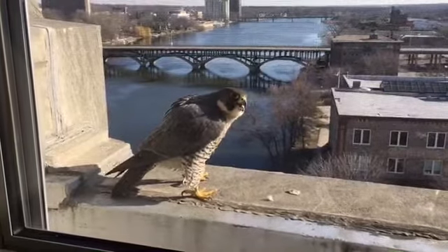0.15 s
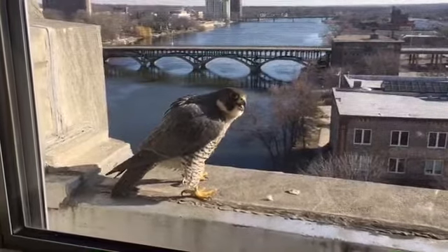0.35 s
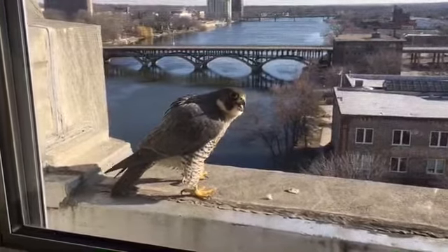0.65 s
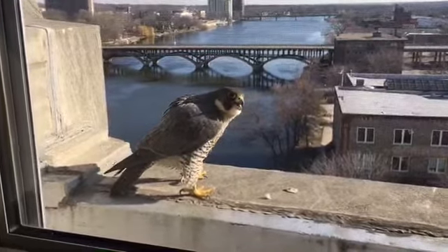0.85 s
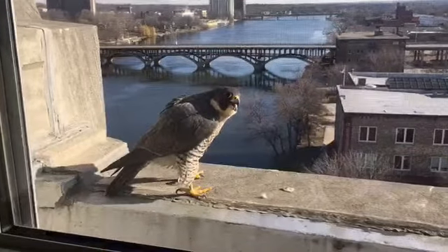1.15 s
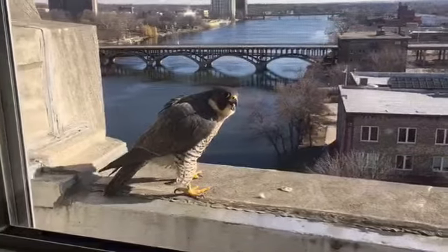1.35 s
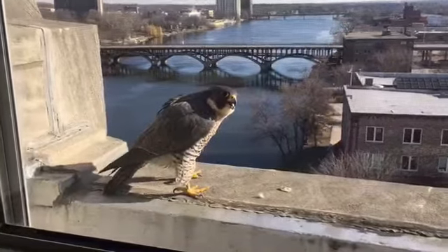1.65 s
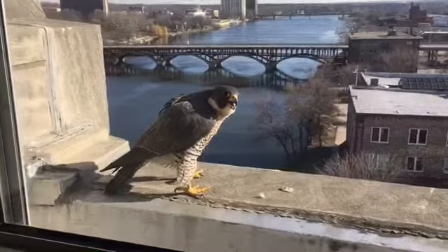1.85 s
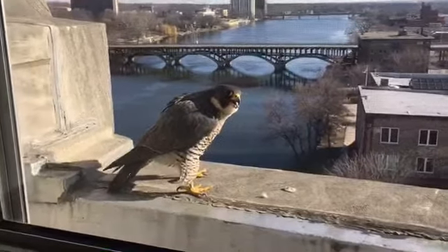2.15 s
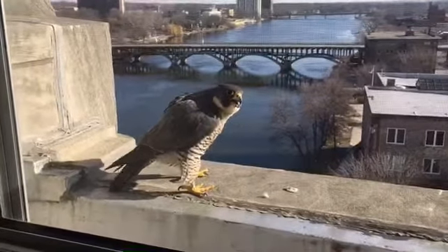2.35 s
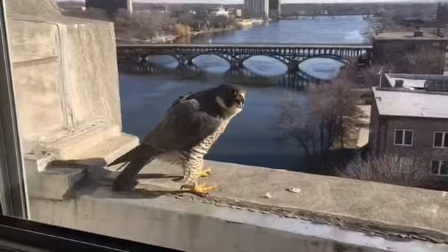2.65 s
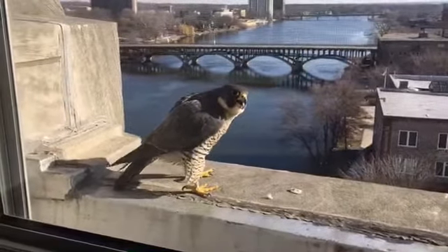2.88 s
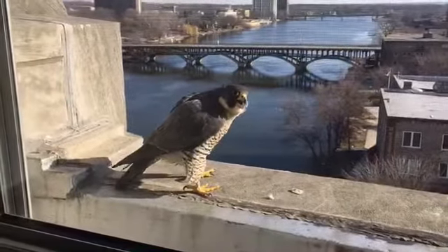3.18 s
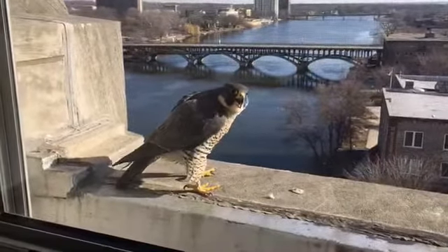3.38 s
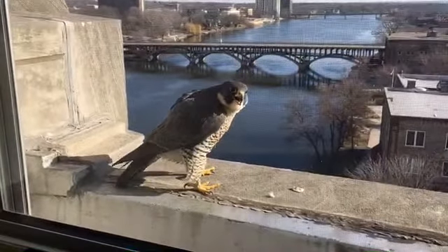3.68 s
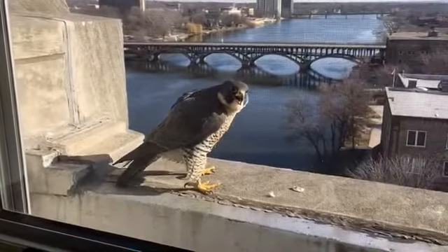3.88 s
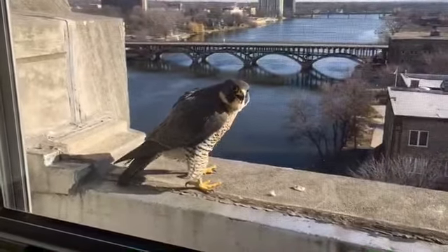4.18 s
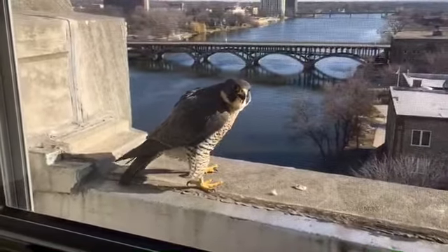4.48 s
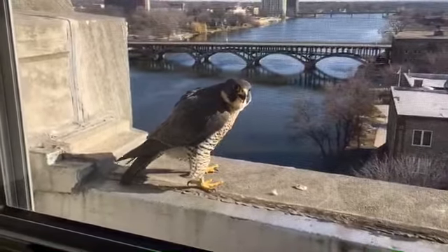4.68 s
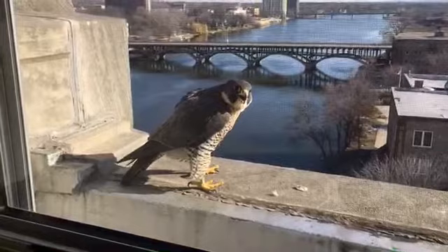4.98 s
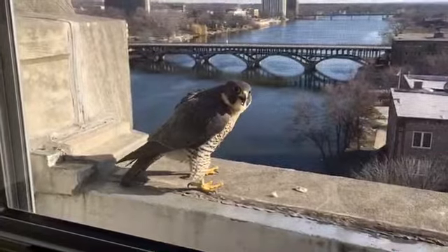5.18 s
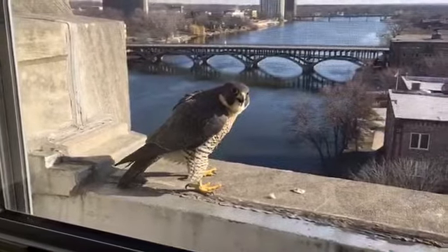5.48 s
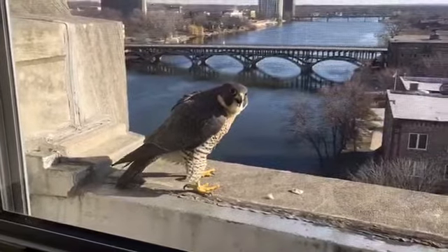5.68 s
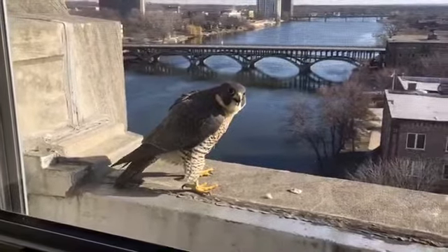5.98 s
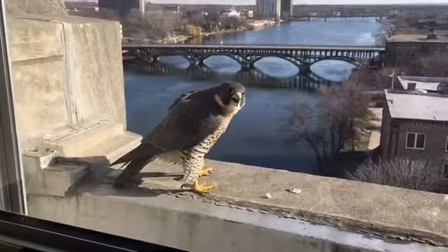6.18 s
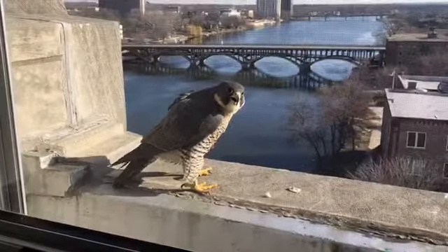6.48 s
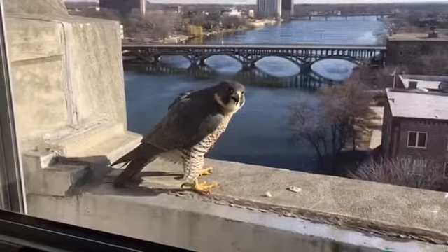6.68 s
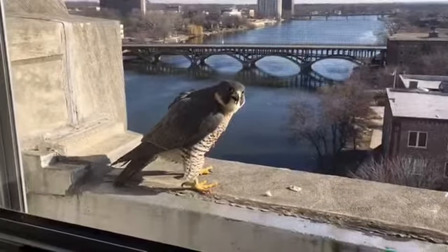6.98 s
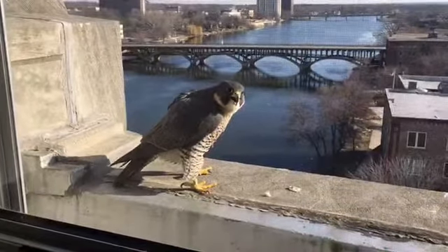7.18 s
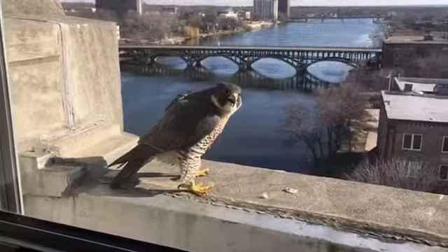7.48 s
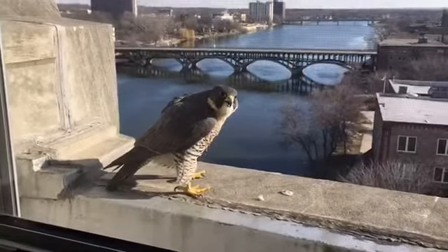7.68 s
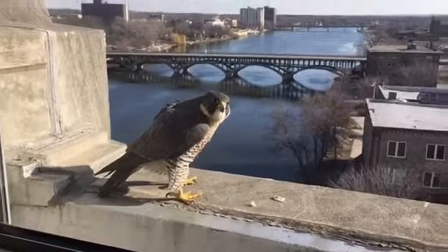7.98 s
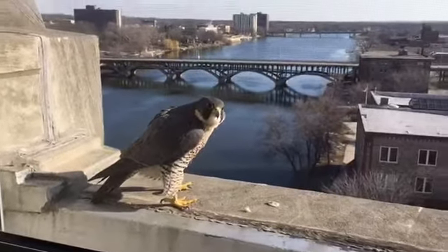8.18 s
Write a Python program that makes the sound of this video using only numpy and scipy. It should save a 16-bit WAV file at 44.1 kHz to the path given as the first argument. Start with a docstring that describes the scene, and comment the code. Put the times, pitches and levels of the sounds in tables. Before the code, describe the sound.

Sharp, raspy falcon cries come in one fast, unbroken run, close by on a stone ledge outside an open window. The calls hold nearly the same pitch and loudness, slowing just a little in the second half. Each has a slight, short echo from the surrounding stone and the room. Underneath lies a faint low rumble and hum of distant traffic and engines.

```python
"""A falcon scolds with a long run of harsh 'kak' calls on a high stone ledge, close to an open window.
Two coupled membranes make each call: a rising whistle and a buzz about two octaves below it.
Midway the buzz breaks loose into a rasp; throat and beak colour the voice.
The stone recess and the room behind the window ring faintly; the city rumbles and hums far below."""
import sys
import numpy as np
from scipy import signal
from scipy.fft import rfft, irfft
from scipy.io import wavfile
from scipy.ndimage import uniform_filter1d

SR = 44100
rng = np.random.default_rng(int(sys.argv[2]) if len(sys.argv) > 2 else 0)


def materialize(psi):
    """Save the field psi as 16-bit PCM at rate SR to the path in sys.argv[1].

    A 1-D psi becomes a single channel; in a 2-D psi each row is a channel.
    """
    bounded = np.clip(np.atleast_2d(psi).T, -1, 1)
    quanta = np.round(bounded * 32767).astype(np.int16)
    wavfile.write(sys.argv[1], SR, quanta)


N = 367794
TIME = np.arange(N) / SR

# calls: (start [s], rasp after [s], length [s], top pitch [Hz], whistle [dB], swell [dB], rasp [dB])
CALLS = [(0.0, 0.08, .140, 1042, -39.5, -2, -37.5), (0.221, 0.092, .149, 1049, -37.5, 6, -38),
         (0.442, 0.086, 0.15, 1051, -39, 2, -38.5), (0.67, 0.086, 0.15, 1050, -37.5, 5, -39),
         (0.897, .091, 0.14, 1049, -37.5, 3.5, -38.5), (1.113, 0.078, .150, 1041, -37.5, 3, -38.5),
         (1.34, 0.089, 0.15, 1051, -36.5, 6.5, -36.5), (1.563, 0.071, 0.14, 1040, -35, 3.5, -37),
         (1.78, 0.087, 0.14, 1058, -35.5, 2, -37), (1.995, .058, 0.15, 1053, -37.5, 3.5, -36.5),
         (2.215, 0.085, .147, 1041, -35.5, 5, -37.5), (2.44, 0.083, 0.14, 1051, -35.5, 6, -37.5),
         (2.651, 0.07, 0.15, 1042, -37.5, 2.5, -36.5), (2.882, 0.086, .140, 1036, -37.5, 1.5, -36.5),
         (3.092, .074, 0.14, 1043, -38.5, 0.5, -37), (3.316, .091, .150, 1051, -37, 7, -36.5),
         (3.543, 0.093, 0.15, 1043, -37.5, 3.5, -37), (3.77, 0.1, 0.15, 1047, -35.5, 5, -37),
         (4.002, 0.093, 0.15, 1040, -37, 6.5, -36.5), (4.221, 0.083, 0.16, 1037, -38, 1, -37),
         (4.461, 0.085, 0.1499, 1048, -37, 4, -39), (4.684, 0.0882, 0.15, 1042, -37.5, 4, -37),
         (4.91, .087, 0.15, 1036, -38, 5, -38.5), (5.148, 0.096, 0.17, 1036, -37.5, 1.5, -37),
         (5.388, .115, 0.16, 1036, -37.5, 3, -38), (5.627, 0.0863, 0.16, 1033, -41.5, -3.5, -38.5),
         (5.859, 0.089, 0.15, 1025, -37.5, 3, -38.5), (6.097, 0.095, 0.17, 1029, -38.5, -0.5, -37),
         (6.351, 0.085, 0.16, 1028, -37.5, 5, -37.5), (6.585, 0.083, 0.16, 1021, -38.5, 0.5, -38),
         (6.821, 0.097, 0.16, 1035, -40, -0.5, -38), (7.069, 0.1, 0.16, 1038, -37.5, 4, -35.5),
         (7.308, 0.081, 0.15, 1047, -37.5, 1, -37.5), (7.538, 0.077, 0.14, 1052, -37.5, 4, -37)]
# whistle harmonics: (multiple [-], relative level [dB])
WHISTLE_HARMONICS = [(1, -14), (2, 4), (3, -11), (4, -16), (5, -42), (6, -31), (7, -39), (8, -33.5),
                     (9, -28.5)]
# throat and beak filter on the buzz: (frequency [Hz], relative gain [dB])
THROAT_COLOUR = [(150, -23), (270, -7.5), (450, -32), (800, -35), (1250, -15.5), (1650, -10), (2250, 4.5),
                 (2750, -1.5), (3200, -6.5), (3500, -11), (3850, -2), (4600, -20.5), (5500, -9),
                 (6600, -28.5), (7700, -18), (9600, -23.5), (10500, -32), (13700, -30), (15500, -39)]
# throat filter, beak half shut: (frequency [Hz], relative gain [dB])
CROAK_COLOUR = [(700, -20.5), (1250, -4.5), (1550, -0.5), (2300, 3.5), (2800, -4.5), (3400, -14.5),
                (6000, -45.5)]
# effect of head aim: (time [s], bite near 3.5 kHz [dB], beak resonance near 5.5 kHz [dB])
HEAD_AIM = [(0, -1.6, 7), (.89, -1, 6.5), (1.11, -1, 0), (1.9, -1.5, -15), (2.9, -1.4, 3), (4.1, -2.7, 4),
            (7.6, -3.5, 3)]
# stone recess resonances: (frequency [Hz], gain [dB])
RECESS_MODES = [(1048, -6), (1339, -2.5), (2070, -9), (2384, -17), (2556, -4), (2768, 5.5), (3100, -4.5),
                (3428, -1), (3686, 7)]
# room behind the window: (frequency [Hz], relative gain [dB])
ROOM_COLOUR = [(200, -2.5), (1050, 9), (2050, 1.5), (3100, 1), (5500, 0.5), (8000, -2.5), (15000, -32)]
# traffic noise: (frequency [Hz], relative density [dB])
TRAFFIC_SPECTRUM = [(25, -22), (38, -5.5), (54, -6), (66, -1), (100, -2.5), (145, -2.5), (200, -15),
                    (300, -15), (420, -27), (680, -33), (1100, -30), (2100, -35), (3500, -42), (7000, -48),
                    (15000, -55)]
# distant machinery: (frequency [Hz], level [dB])
MACHINE_DRONES = [(54.5, -58.5), (78.5, -60), (118, -58), (241, -67)]
# engines that come and go: (start [s], length [s], frequency [Hz], level [dB])
ENGINE_SWELLS = [(-.3, .6, 77.3, -50), (0.352, 1.1, 54.5, -52), (1.95, 0.65, 79, -60),
                 (2.85, 1.9, 55.24, -51.5), (3.75, 1.73, 78.66, -53.5), (5.9, 1.5, 53.6, -58),
                 (6.25, 1.53, 114.7, -53.5)]
# distant motor whine: (time [s], level [dB])
MOTOR_LEVEL = [(0, -69.5), (1.1, -72.5), (4, -76.5), (8.34, -77)]
# thin whines: (frequency [Hz], level [dB])
THIN_WHINES = [(1394, -86), (1739, -82.5)]

ONSET_S, OFFSET_S = .005, .012
CROAK_S, CLEARING_S, BREAK_S = .019, .0132, .02014
CROAK_ROUGH, BASE_ROUGH = .9, .05965  # full rasp = 1
SCOOP_SHARE, SCOOP_SCATTER, SCOOP_TAU_S = .135, .2197, .032
SAG_AFTER_S, SAG_SHARE_PER_S = .1, .42  # pitch sags as the call tires
ATTACK_S, SWELL_S, RELEASE_S, WAVER_DB = .035, .17, .037, 1.35
ATTACK_DB_PER_S, RELEASE_DB_PER_S = 529, 576
BUZZ_DB, RASP_RELEASE_S, RASP_RELEASE_DB_PER_S = -45.5, .024, 420
SHUT_DB, OPEN_DB, OPENING_DB_PER_S, CLOSING_DB_PER_S = -12, 4.5, 23, 214
CROAK_DB, CROAK_LOSS_DB_PER_DB = -49.5, .42


def falcon():
    """Run of calls, each coloured by head aim."""
    out = np.zeros(N + SR)
    times_s, bites_db, beaks_db = np.transpose(HEAD_AIM)
    for start_s, *shape in CALLS:
        call = kak(*shape, np.interp(start_s, times_s, bites_db), np.interp(start_s, times_s, beaks_db))
        i = int(start_s * SR)
        out[i:i + len(call)] += stone_scatter(call)
    return out[:N]


def kak(split_s, length_s, top_hz, level_db, swell_db, rasp_db, bite_db, beak_db):
    """One call: dull croak, rising whistle over a buzz, rasp, croak again as the beak closes."""
    t = np.arange(int((length_s + OFFSET_S + .03) * SR)) / SR
    gate = ramp(t, 0, ONSET_S) * (1 - ramp(t, length_s, OFFSET_S))
    break_start_s = split_s - BREAK_S / 2
    cleared, broken = ramp(t, CROAK_S, CLEARING_S), ramp(t, break_start_s, BREAK_S)
    rough = np.clip(CROAK_ROUGH * (1 - cleared) + BASE_ROUGH + broken, 0, 1)
    scoop = SCOOP_SHARE * (1 + SCOOP_SCATTER * rng.standard_normal())
    hz = top_hz * (1 - scoop * np.exp(-t / SCOOP_TAU_S) - SAG_SHARE_PER_S * past(t, SAG_AFTER_S))
    whistle, puffs = syrinx(t, hz, rough)
    puffs = stone_smear(puffs)
    whistle_db = (level_db + swell_db * (ramp(t, ATTACK_S, SWELL_S) - .5) + WAVER_DB * walk(40, len(t))
                  - ATTACK_DB_PER_S * past(ATTACK_S, t)
                  - RELEASE_DB_PER_S * past(t, length_s - RELEASE_S))
    buzz_db = (BUZZ_DB + (rasp_db - BUZZ_DB) * broken
               - RASP_RELEASE_DB_PER_S * past(t, length_s - RASP_RELEASE_S))
    buzz = convolve(puffs, response(THROAT_COLOUR))
    # main throat resonance rings in full only when rough
    buzz -= .53 * (1 - rough) * (lowpass(buzz, 2550) - lowpass(buzz, 1350))
    voice = whistle * undb(whistle_db) + buzz * undb(buzz_db)
    opening_db = (OPEN_DB - SHUT_DB - OPENING_DB_PER_S * past(split_s, t)) * cleared
    opening_db = np.maximum(opening_db - CLOSING_DB_PER_S * past(t, break_start_s), 0)
    croak = convolve(puffs, response(CROAK_COLOUR)) * undb(CROAK_DB - CROAK_LOSS_DB_PER_DB * opening_db)
    return gate * (beak(voice, SHUT_DB + opening_db, bite_db, beak_db) + croak)


def syrinx(t, hz, rough, side_gain=.15, rasp_speedup=.16):
    """Two coupled membranes: whistle from the fast one, hissy puffs from the slow one."""
    n = len(t)
    fast_cycles = np.cumsum(hz * (1 + .0056 * walk(69.4, n) + .018 * rough * walk(700, n))) / SR
    # about one beat in four cycles; faster and uneven when rough
    slow_cycles = np.cumsum(hz / 4 * np.exp(rough * (rasp_speedup + .08 * walk(300, n)))) / SR
    beat = np.cos(2 * np.pi * slow_cycles)
    # each beat tugs the whistle, adding side tones
    tugged_cycles = fast_cycles + .001 * beat + .019 * rough * walk(600, n)
    whistle = np.zeros(n)
    for multiple, db in WHISTLE_HARMONICS:
        waver_db = .4 if multiple == 2 else 2.2
        harmonic = np.sin(2 * np.pi * multiple * tugged_cycles)
        side_tone = np.sin(2 * np.pi * (multiple * tugged_cycles + slow_cycles))
        whistle += undb(db + waver_db * walk(42.7, n)) * (harmonic + side_gain * side_tone)
    whistle *= 1 + (.08 + .2 * rough) * beat
    whistle *= undb(1.5 * rough * walk(220, n))
    air = unit_rms(rng.standard_normal(n) * (1 + .5 * beat))
    puffs = pulses(slow_cycles, scatter_db=1.9 * rough) * (1 - .38 * rough) + (.22 + .34 * rough) * air
    return unit_rms(whistle), puffs


def pulses(cycles, scatter_db):
    """One sharp pulse of random size per membrane cycle."""
    samples = np.arange(len(cycles))
    onsets = np.interp(np.arange(1, int(cycles[-1])), cycles, samples)
    gains = undb(np.interp(onsets, samples, scatter_db) * rng.standard_normal(len(onsets)))
    return unit_rms(gains @ np.sinc(samples - onsets[:, None]))


def beak(voice, gape_db, bite_db, beak_db, top_db=-.8):
    """Head aim weights the upper resonances; a wider gape lets more treble out."""
    body, below_beak, below_top = (lowpass(voice, hz) for hz in (2270, 5140, 5890))
    bite = (below_beak - body) * undb(bite_db + .49 * gape_db)
    treble = (below_top - below_beak) * undb(beak_db) + (voice - below_top) * undb(top_db)
    return body + bite + treble * undb(gape_db)


def stone_smear(x, spread_s=.001243, points=60):
    """Nearby stone: random delay and gain per frequency, new for each turn of the head."""
    hz = np.arange(len(x) // 2 + 1) * SR / len(x)
    grid_hz = np.linspace(0, SR / 2, points)
    delay_s = spread_s * np.interp(hz, grid_hz, rng.standard_normal(points))
    depth_db = np.interp(hz, [2300, 5000], [1.4, 2.2])
    ripple_db = depth_db * np.interp(hz, grid_hz, rng.standard_normal(points))
    lag_cycles = np.cumsum(delay_s) * hz[1]
    return irfft(rfft(x) * undb(ripple_db) * np.exp(-2j * np.pi * lag_cycles), len(x))


def stone_scatter(x, scatter_db=-5):
    """Rough stone and the window frame scatter the treble."""
    treble = x - lowpass(x, 2300)
    return x + undb(scatter_db) * convolve(treble, reflections(t60_s=.049)[:len(x)])


def ledge(x, recess_t60_s=.094, room_db=-17.5):
    """The stone recess rings briefly; the room adds a short dull tail."""
    t = TIME[:SR // 4]
    decay = np.exp(-np.log(1000) * t / recess_t60_s)
    modes = sum(undb(db) * np.cos(2 * np.pi * hz * t) for hz, db in RECESS_MODES)
    x = x + convolve(x, 2 * decay / decay.sum() * modes)
    dulled = convolve(x, response(ROOM_COLOUR))
    return x + undb(room_db) * convolve(dulled, reflections(t60_s=.31))


def reflections(t60_s, rise_s=.00022):
    """Decaying cloud of echoes, unit energy."""
    t = TIME[:SR]
    cloud = rng.standard_normal(SR) * np.exp(-np.log(1000) * t / t60_s) * ramp(t, 0, rise_s)
    return cloud / np.sqrt(np.sum(cloud ** 2))


def city(engine_fade_s=.14, motor_hz=543.7):
    """Far below: traffic, machine drones, engines that come and go, a motor, thin whines."""
    out = traffic() + sum(drone(hz, db) for hz, db in MACHINE_DRONES)
    for start_s, length_s, hz, db in ENGINE_SWELLS:
        fade = ramp(TIME, start_s, engine_fade_s) * ramp(start_s + length_s, TIME, engine_fade_s)
        out += drone(hz, db) * fade
    motor_db = np.interp(TIME, *np.transpose(MOTOR_LEVEL))
    return out + whine(motor_hz, motor_db) + sum(whine(hz, db) for hz, db in THIN_WHINES)


def traffic(level_db=-51, rumble_swell_db=.8, hiss_swell_db=.5):
    """Distant traffic: rumble and hiss, each swelling slowly."""
    noise = convolve(rng.standard_normal(N), response(TRAFFIC_SPECTRUM, size=16384))
    rumble = lowpass(noise, 190)
    hiss = noise - rumble
    return (rumble * undb(level_db + rumble_swell_db * walk(1.14))
            + hiss * undb(level_db + hiss_swell_db * walk(1.61)))


def drone(hz, db, waver_hz=1.34, flutter_db=2.2):
    """Low machine tone, unsteady in pitch and level."""
    tone = np.sin(2 * np.pi * np.cumsum(hz + waver_hz * walk(9)) / SR)
    return unit_rms(tone * undb(flutter_db * walk(11))) * undb(db)


def whine(hz, db, waver_hz=2.47, flutter_db=3):
    """Thin far tone, wavering in moving air."""
    tone = np.sin(2 * np.pi * np.cumsum(hz + waver_hz * walk(15)) / SR)
    return unit_rms(tone) * undb(db + flutter_db * walk(12))


def walk(rate_hz, size=N):
    """Smooth random motion, spread about 1."""
    hold = max(int(SR / rate_hz), 2)
    steps = np.repeat(rng.standard_normal(size // hold + 3), hold)
    return 1.22 * uniform_filter1d(steps, hold)[hold:hold + size]


def response(colour, size=1024):
    """Minimum-phase impulse response, unit energy, from (frequency [Hz], gain [dB])."""
    hz, db = np.transpose(colour)
    bins_hz = np.maximum(np.arange(size // 2 + 1) * SR / size, 1)
    gain = undb(np.interp(np.log(bins_hz), np.log(hz), db))
    cepstrum = irfft(np.log(gain))
    cepstrum[1:size // 2] *= 2
    cepstrum[size // 2 + 1:] = 0
    impulse = irfft(np.exp(rfft(cepstrum)))
    return impulse / np.sqrt(np.sum(impulse ** 2))


def convolve(x, impulse):
    return signal.fftconvolve(x, impulse)[:len(x)]


def lowpass(x, hz):
    return signal.sosfiltfilt(signal.butter(4, hz, fs=SR, output="sos"), x)


def ramp(t, start_s, length_s):
    return np.clip((t - start_s) / length_s, 0, 1)


def past(t, start_s):
    return np.maximum(t - start_s, 0)


def undb(db):
    return 10 ** (np.asarray(db) / 20)


def unit_rms(x):
    return x / np.sqrt(np.mean(x ** 2))


def scene():
    """Falcon on its ledge over the city, mono."""
    return (ledge(falcon()) + city())[None]


def record(dry):
    """Recorder: steep low-pass at 15.5 kHz."""
    return signal.sosfilt(signal.ellip(10, .2, 80, 15500, fs=SR, output="sos"), dry)


dry = scene()
out = record(dry)
materialize(out)
```